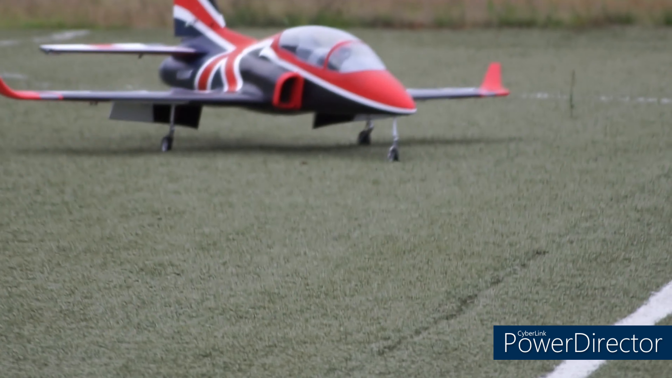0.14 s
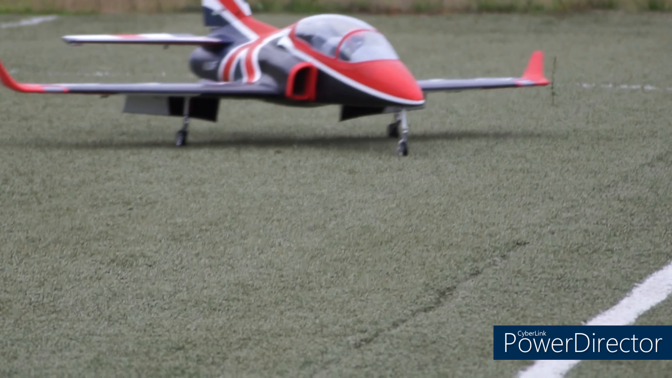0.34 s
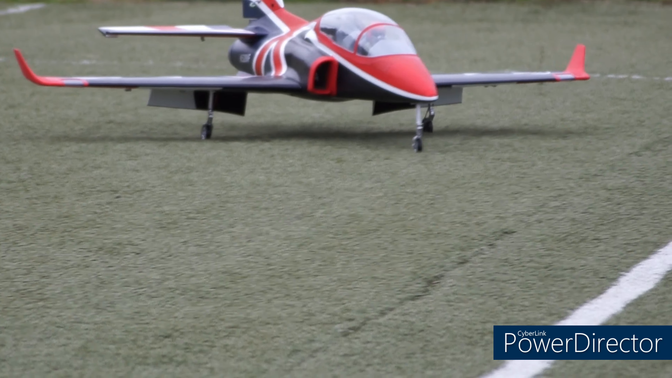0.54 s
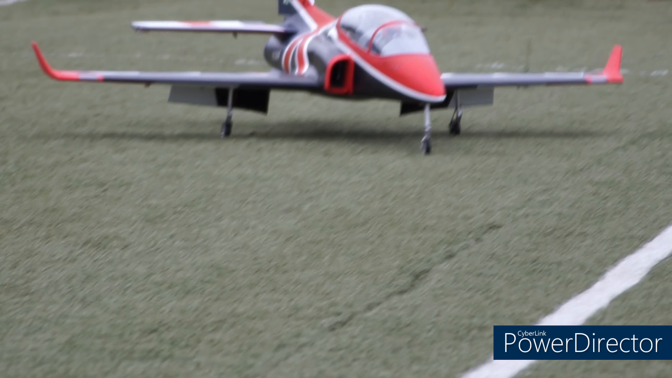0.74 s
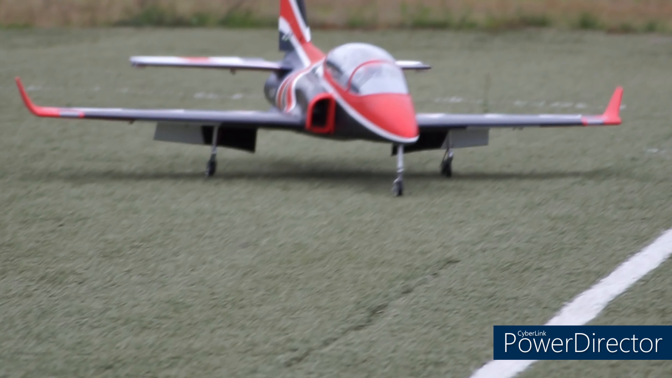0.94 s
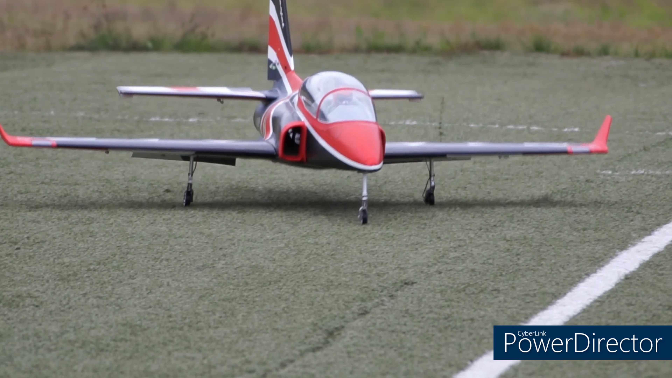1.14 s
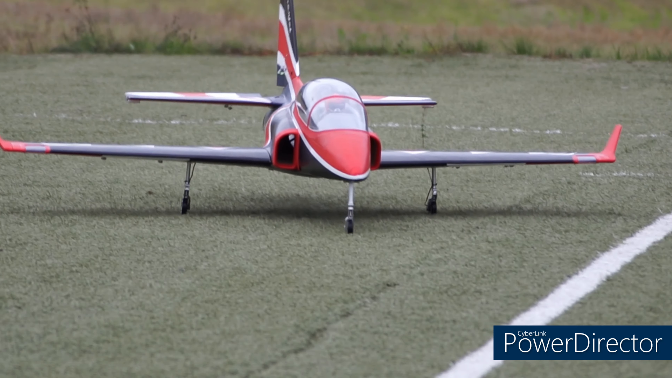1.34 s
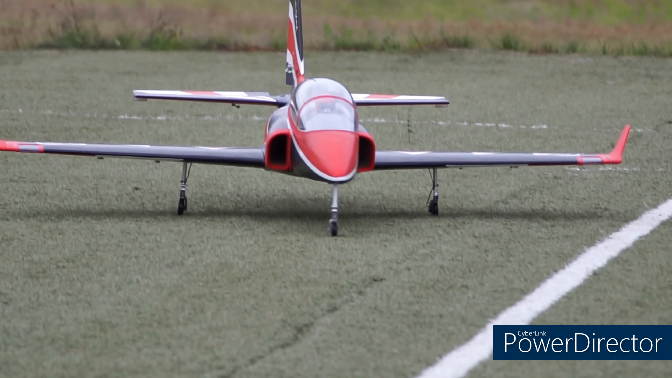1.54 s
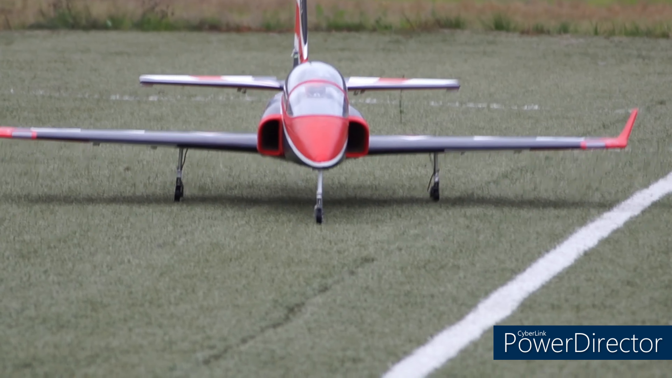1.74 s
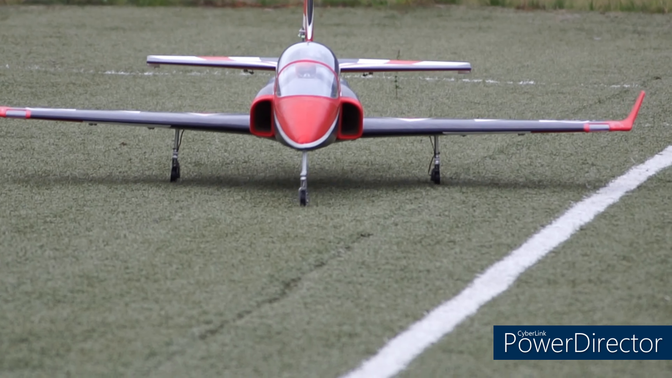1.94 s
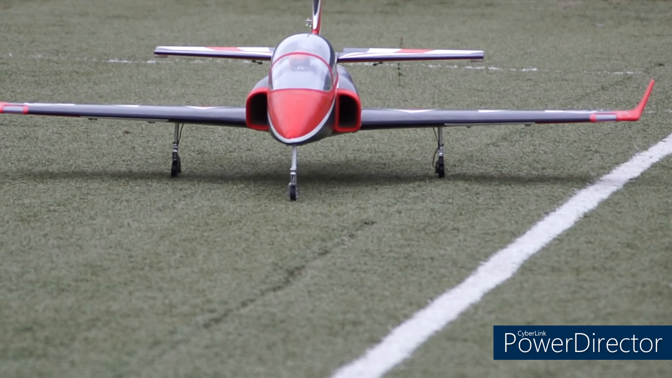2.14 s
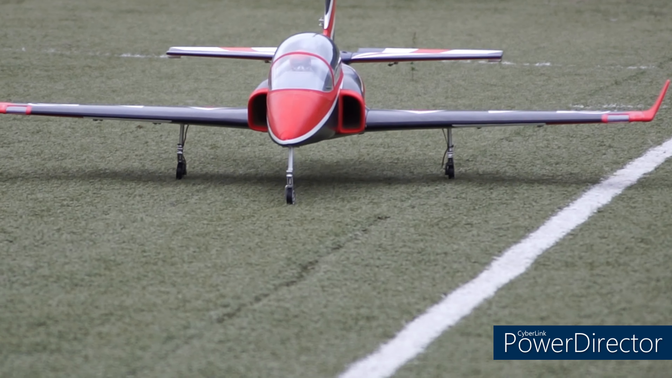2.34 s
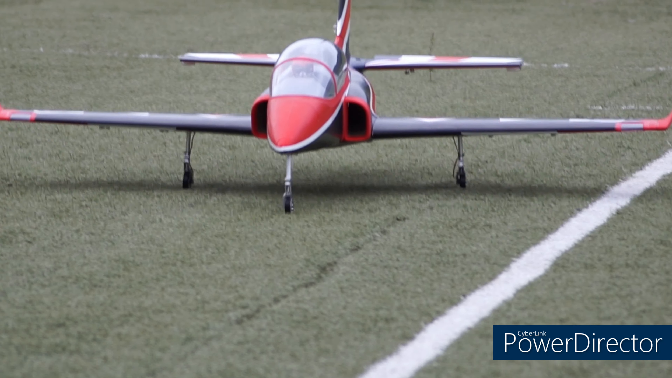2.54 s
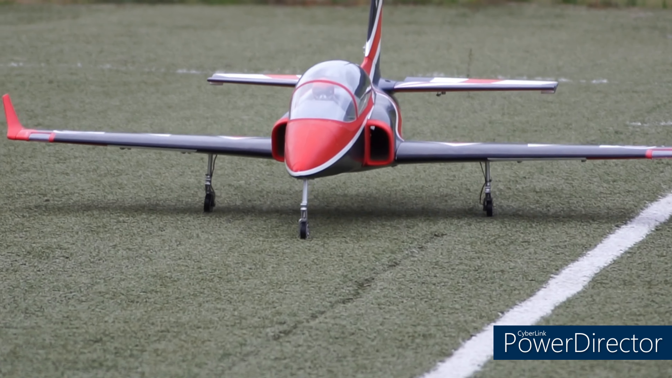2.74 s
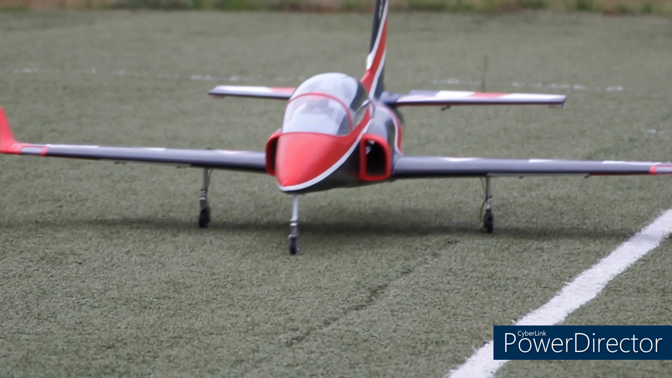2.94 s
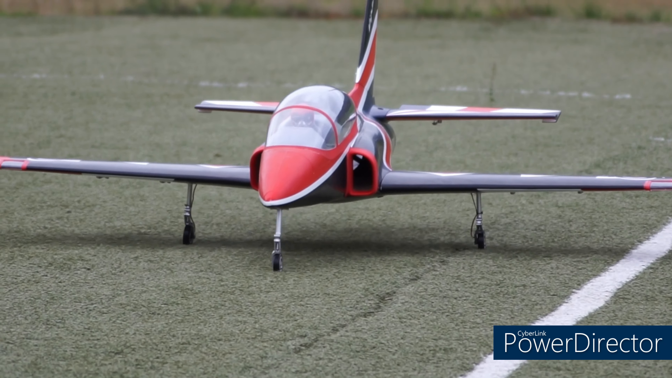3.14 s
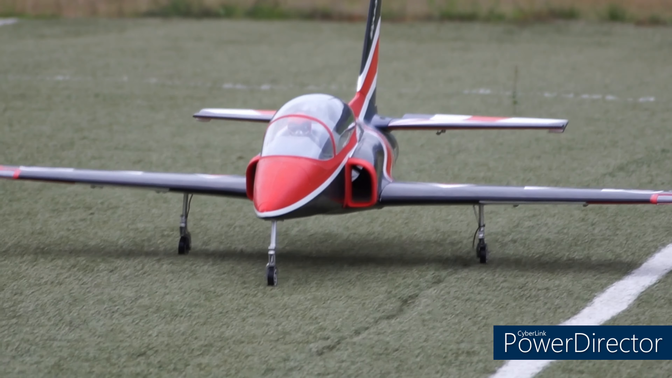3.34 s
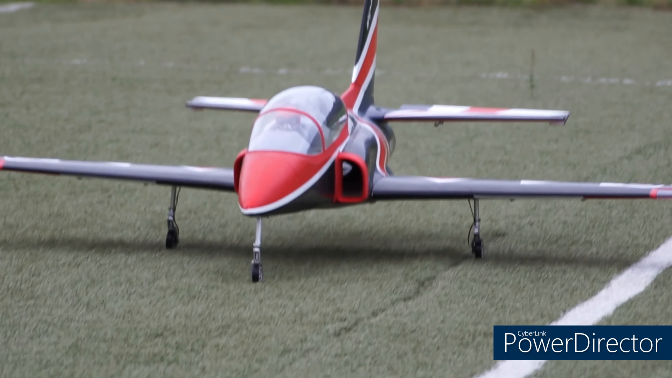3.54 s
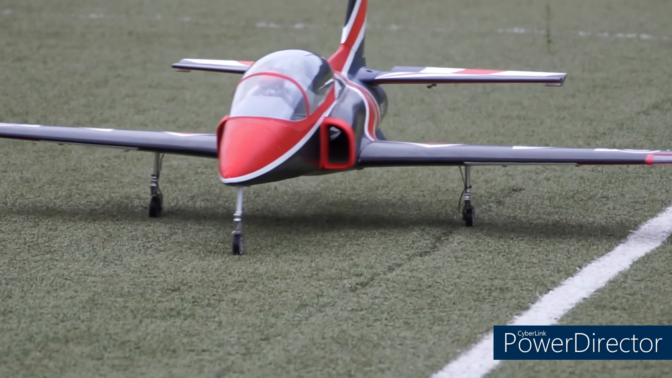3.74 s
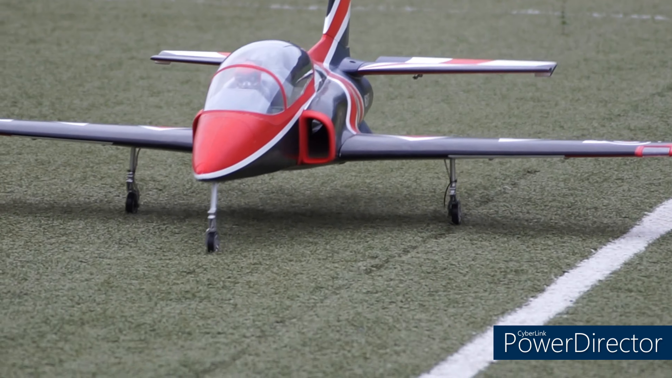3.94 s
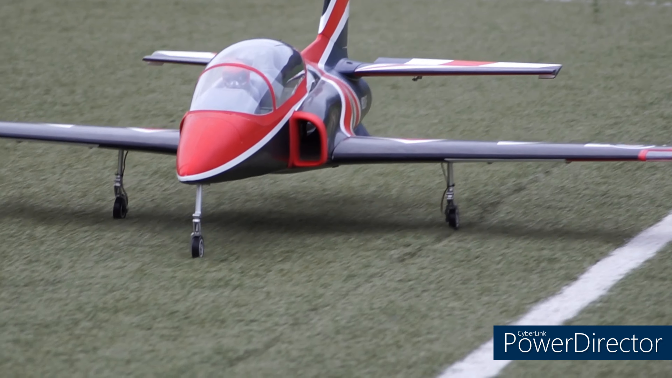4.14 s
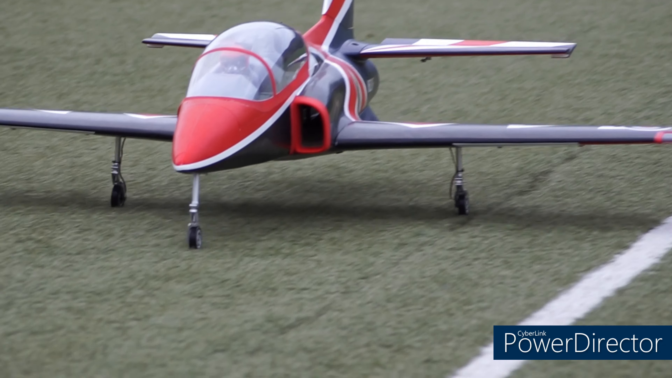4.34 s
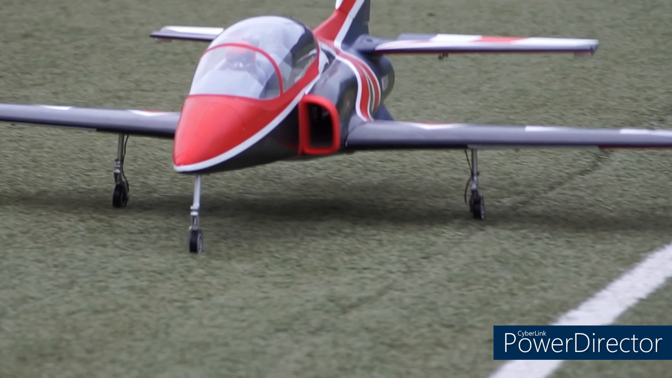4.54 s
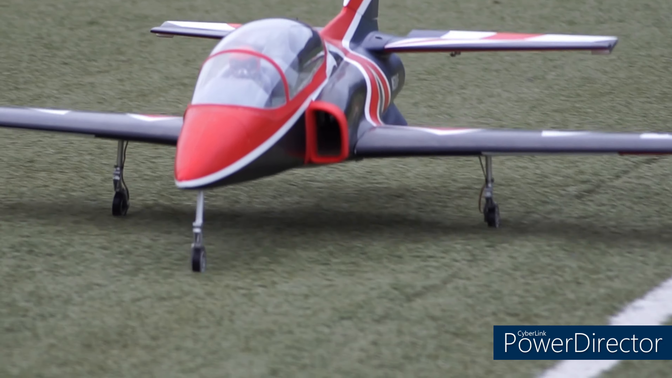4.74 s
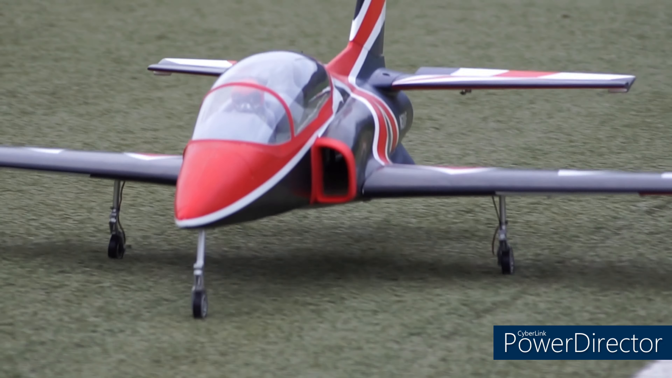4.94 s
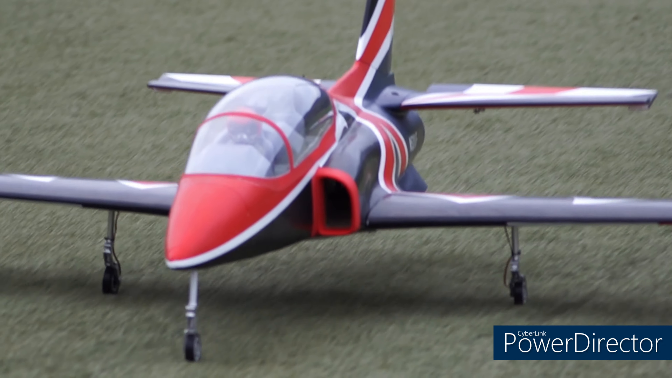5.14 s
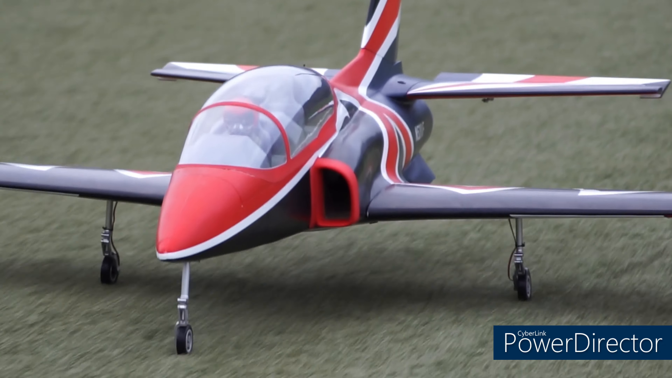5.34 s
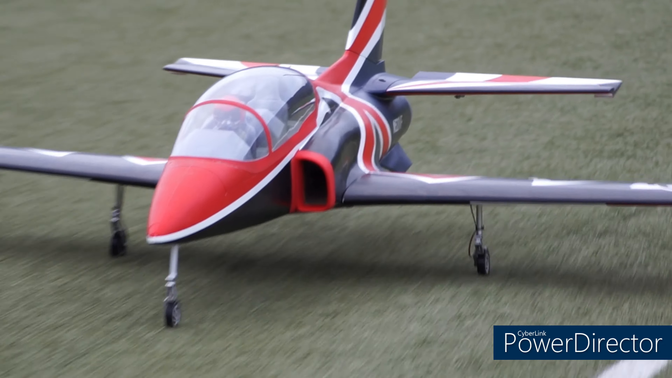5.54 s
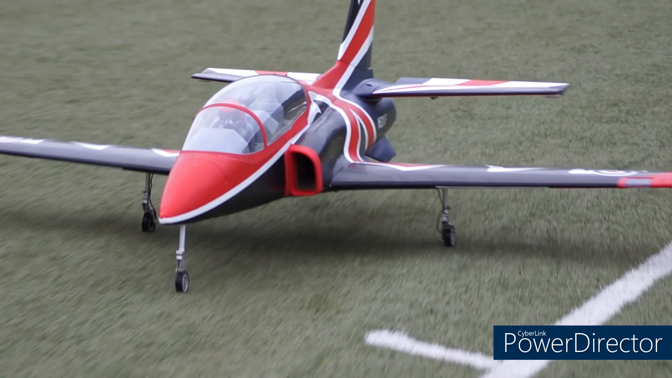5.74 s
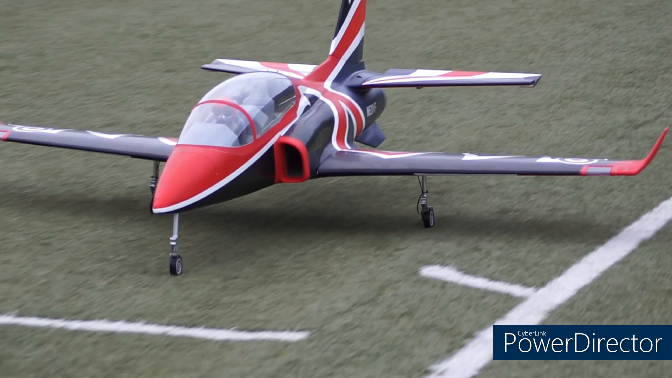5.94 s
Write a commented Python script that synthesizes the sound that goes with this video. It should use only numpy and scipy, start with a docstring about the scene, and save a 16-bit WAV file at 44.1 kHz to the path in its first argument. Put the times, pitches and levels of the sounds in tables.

```python
"""A five-bladed ducted fan whines and hisses: a model jet taxis over turf towards the listener.
It throttles down and up again; a beam of blade tone passes as the nose swings by.
The speed controller whistles at a fixed pitch, with sum and difference tones from the turning motor.
Sharp ticks and dull bumps, probably of the microphone housing, are struck modes; a faint breeze is noise."""
import sys
import numpy as np
from scipy import signal
from scipy.fft import rfft, irfft
from scipy.io import wavfile

SR = 44100
rng = np.random.default_rng(int(sys.argv[2]) if len(sys.argv) > 2 else 0)


def wav_out(sig):
    """Save sig, one row per channel (or a flat mono array), as 16-bit PCM at SR to the path in sys.argv[1]."""
    wavfile.write(sys.argv[1], SR, np.round(np.clip(np.atleast_2d(sig).T, -1, 1) * 32767).astype(np.int16))


N = 268569
TIME_S = np.arange(N) / SR
FREQS_HZ = np.maximum(np.arange(N // 2 + 1) * SR / N, 1)
LEFT_RIGHT = np.array([[.5], [-.5]])   # splits a difference evenly between the ears

BLADES, POLES = 5, 12
SWITCHING_HZ, HOOT_HZ = 7721, 1180
CRUISE_TURNS_PER_S = 530
START_M, TAXI_M_PER_S = 12, 1.0
BEAM_DB, BEAM_WIDTH_DEG = -48.5, 4.3
PAN_START_DB, PAN_DB_PER_S = 0.5, -0.39   # left minus right: a slow crossing to the right
SLIP_S = 0.0045
CALM_DB = -81
WIND_FILTER_HZ, CUTOFF_HZ = 45, 15800

# fan shaft speed under throttle: time_s, turns_per_s
SHAFT_SPEED = [(0, 483), (.29, 483), (.42, 464), (.58, 438), (.78, 426), (1.35, 431), (2.08, 462),
               (2.42, 515), (2.5, 530), (2.74, 537), (3.08, 526.5), (3.86, 525.6), (4.03, 542),
               (4.13, 544.7), (4.27, 542.5), (4.57, 539), (4.8, 528), (4.97, 526.4), (5.18, 538),
               (5.63, 536.6), (5.95, 528.5), (6.09, 524)]
# nose off the line of sight: time_s, heading_deg
NOSE_HEADING = [(0, -28.5), (1.72, 0.5), (2.3, 8), (3, 6), (6.09, 42)]
# reference loudness of each jet part, before its spectral shaping: part: (level_db at cruise, start
# distance and head-on; db_per_speed_doubling; db_per_distance_halving; side_on_gain_db)
PART_LEVELS = {"rumble": (-66, 13.5, 7, 13.5), "rush": (-49.5, 6, 6, 1), "exhaust": (-51.5, 25, 11.5, 9),
               "intake": (-39, 24, 4, -10), "hiss": (-51, 5, 13, -2.7), "blade": (-58.5, 8.5, 17, 11.5),
               "octave": (-40, 6, 0, -2), "third": (-50.5, -2, 11.5, -6.5), "upper": (-54.5, 6, 11.5, 2),
               "beat": (-35, -6, 5.5, -1)}
# duct response to the first three blade harmonics: pitch_hz, gain_db
DUCT_RESPONSE = [(2130, 0), (2300, 4), (2350, 1.5), (2420, 0), (2470, 0), (2570, -9), (2622, -2.5),
                 (2720, -2.5), (4250, -4.5), (4500, -3), (4640, -8.5), (4830, -14), (5150, -0.5),
                 (5330, 1.5), (6400, 3), (6900, 1), (7300, 0), (7900, -9), (8000, -7), (8060, -1.5),
                 (8170, -39)]
# upper blade harmonics, all smeared: multiple, relative_level_db, width_hz
UPPER_HARMONICS = [(4, -1.5, 570), (5, -7.5, 500)]
# the octave rings out clean for a moment: centre_s, level_db, width_s
OCTAVE_SWELL_ROWS = [(.72, -43.5, 0.039)]
# controller whistle fading in and out: time_s, relative_level_db
WHISTLE_FADES = [(0.0, -65), (0.29, -58), (0.64, -78), (0.77, -78), (0.79, -67), (1.05, -78), (1.19, -62),
                 (1.43, -59), (1.61, -70), (1.84, -56), (2.14, -54), (2.45, -60), (2.88, -53), (4.6, -62)]
# sum tone, one blade rate above switching: time_s, level_db
SUM_TONE_FADES = [(0, -76), (1.3, -64), (2.8, -78), (4.2, -48), (6.09, -57)]
# fuselage radiation of the difference tone: pitch_hz, gain_db
FUSELAGE_RESPONSE = [(1185, 0), (1202, -2), (1220, -11.5), (1272, -11.5), (1335, -22), (1400, -17.5),
                     (1455, -19), (1535, -9), (1640, -24), (1900, -53)]
# one hoot of the hollow resonance: centre_s, level_db, width_s
HOOT_SWELL_ROWS = [(2.07, -49.5, 0.085)]
# airflow noise colours: pitch_hz, relative_density_db_per_hz
RUMBLE_SPECTRUM = [(20, -48), (60, -25), (130, -15), (190, 1), (290, -2.5), (440, 6.5), (500, 2), (600, 4),
                   (900, -29)]
RUSH_SPECTRUM = [(300, -40), (520, -33), (660, 1.5), (750, -3.5), (920, 3), (1060, -4), (1270, -1),
                 (1400, -1), (1560, -0.5), (1900, -7.5), (2200, -3), (2600, -16.5), (4000, -17)]
EXHAUST_SPECTRUM = [(300, -64), (1000, -26), (2000, -8), (2450, 2.5), (3200, 1.5), (3800, 4), (4400, 6.5),
                    (4900, -2), (5800, -25), (7300, -11), (8200, -4.5), (9500, -4), (10800, -9.5),
                    (12000, -24)]
INTAKE_SPECTRUM = [(3000, -40.5), (3700, -12.5), (4200, -2), (4800, 2.5), (5400, 0), (6000, 2.5),
                   (6600, -1), (7000, -3), (7400, -24.5), (9000, -40), (12000, -46)]
HISS_SPECTRUM = [(2000, -39), (5000, 0), (7000, -2), (7900, -1), (8800, 1), (10000, 0), (10800, -4),
                 (11800, 0), (12500, 2), (13500, 1.5), (14600, 3), (15700, -6), (16000, -4)]
# left-right likeness of air noise: pitch_hz, likeness (0 to 1)
EAR_LIKENESS = [(30, .88), (70, 0.43), (130, 0.99), (280, 1), (650, 0.77), (1500, 0.7), (2100, 0.92),
                (3200, 0.72), (4500, 1), (5400, 0.94), (6300, 0.88), (7200, 0.78), (8000, 0.98), (9200, 1),
                (10800, 0.57), (12500, 0.77), (14000, 1)]
# microphone port colour: pitch_hz, left_minus_right_db
PORT_DIFFERENCE = [(200, 0.5), (1300, 1), (2500, -2), (3400, 1), (4500, 1), (6000, 3), (8000, -1.5),
                   (11000, 0.7), (14000, 1.5)]
# housing ticks: start_s, relative_peak_db, front_pitch_hz, relative_rattle_db
HOUSING_TICKS = [(0.0719, -16.5, 6500, -5.5), (0.1199, -29, 3340, 2), (0.166, -42, 3000, 2),
                 (0.743, -31.5, 2820, -7.5), (.791, -23, 2040, -13), (0.7971, -17, 6170, -10.5),
                 (0.89, -18, 2970, -11), (0.9514, -14, 6850, -7.5), (.960, -27.5, 3660, -3),
                 (1.002, -38.5, 2000, -0.5), (1.102, -41.5, 2220, -1), (2.276, -35.5, 2800, 0),
                 (2.3254, -18, 5500, -7.5), (2.3319, -19, 2200, -4), (3.103, -15.5, 7150, -6.5),
                 (3.11, -21, 2600, -10), (4.775, -27.5, 2000, -15), (4.819, -21, 2620, -7),
                 (4.829, -8, 2200, -13), (5.245, -20, 2420, -4), (5.448, -26, 1780, -5),
                 (5.566, -22, 1880, -9)]
# housing modes: pitch_hz, relative_level_db, t60_s
HOUSING_MODES = [(678, -13.5, 0.12), (932, -5, 0.023), (1125, -5, 0.056), (1483, 3.5, 0.019),
                 (1690, -4.5, 0.027), (1820, -14.5, 0.0065), (1937, 5, 0.01), (2332, 1, 0.063),
                 (2650, 0, 0.014), (3320, -0.5, 0.026), (4020, -30, 0.029), (3980, 6, 0.0028),
                 (5680, 3, 0.0051)]
# duller housing bumps: start_s, force_db
HOUSING_BUMPS = [(0.124, -38.5), (0.801, -48), (.9, -42), (1.004, -47), (2.3365, -31.5), (4.831, -31.5),
                 (5.304, -36)]
# breeze colour: pitch_hz, relative_density_db_per_hz
BREEZE_COLOUR = [(20, -22), (45, -6), (70, -4), (105, -3), (160, -6.5), (400, -25)]
# puffs of breeze: centre_s, level_db, width_s
BREEZE_GUSTS = [(1.2, -75, 0.16), (1.7, -76, 0.35), (3.5, -78, 0.49)]


def fan(angle_rad, turns_per_s, heading_deg, gain):
    """Blades sound harmonics of their passing rate; the higher ones are more smeared by turbulence."""
    blade_rad, blade_hz = BLADES * angle_rad, BLADES * turns_per_s

    # the blade tone also beams straight ahead out of the intakes
    beam = from_db(BEAM_DB) * np.exp(-(heading_deg / BEAM_WIDTH_DEG) ** 2)
    fundamental = gain["blade"] * passed(DUCT_RESPONSE, blade_hz)
    clean_first = tone(blade_rad, flutter_db=2.5, wobble_rad=0.63, ear_shift_rad=0.27)
    out = (from_db(-1.5) * fundamental + beam) * clean_first
    out = out + fundamental * skirt(blade_rad, width_hz=123, spread=0.25)

    octave = gain["octave"] * passed(DUCT_RESPONSE, 2 * blade_hz)
    clean_octave = tone(2 * blade_rad, flutter_db=3.0, wobble_rad=0.43, ear_shift_rad=.15)
    out = out + (from_db(-4.5) * octave + swells(OCTAVE_SWELL_ROWS)) * clean_octave
    out = out + octave * skirt(2 * blade_rad, width_hz=204, spread=0.11)

    third = gain["third"] * passed(DUCT_RESPONSE, 3 * blade_hz)
    out = out + third * skirt(3 * blade_rad, width_hz=340, spread=0.23)
    for multiple, level_db, width_hz in UPPER_HARMONICS:
        smeared = skirt(multiple * blade_rad, width_hz, spread=0.34)
        out = out + gain["upper"] * from_db(level_db) * smeared
    return out


def drive(angle_rad, turns_per_s, gain):
    """Windings sing at the switching rate; rotation adds sum and difference tones; the fuselage hoots."""
    switching_rad = 2 * np.pi * SWITCHING_HZ * TIME_S
    whistle = tone(switching_rad, flutter_db=1.0, wobble_rad=0.3, ear_shift_rad=0.95)
    whistle = from_db(5.0 + in_time(WHISTLE_FADES)[0]) * whistle

    difference_hz = SWITCHING_HZ - POLES * turns_per_s
    difference_rad = switching_rad - POLES * angle_rad
    difference = tone(difference_rad, flutter_db=1.17, wobble_rad=0.4, ear_shift_rad=0.087)
    difference = gain["beat"] * passed(FUSELAGE_RESPONSE, difference_hz) * difference

    sum_rad = switching_rad + BLADES * angle_rad
    sum_tone = tone(sum_rad, flutter_db=3.0, wobble_rad=1.5, ear_shift_rad=0.49)
    sum_tone = from_db(in_time(SUM_TONE_FADES)[0]) * sum_tone

    hoot = tone(2 * np.pi * HOOT_HZ * TIME_S, flutter_db=6.0, wobble_rad=.6, ear_shift_rad=.3)
    return whistle + difference + sum_tone + swells(HOOT_SWELL_ROWS) * hoot


def airflow(gain):
    """Wheels and jet rumble over turf; air rushes through intakes and tailpipe, each part wavering."""
    spectra = {"rumble": RUMBLE_SPECTRUM, "rush": RUSH_SPECTRUM, "exhaust": EXHAUST_SPECTRUM,
               "intake": INTAKE_SPECTRUM, "hiss": HISS_SPECTRUM}
    out = 0
    for part, spectrum in spectra.items():
        waver = from_db(0.96 * drift(3.2))
        out = out + gain[part] * waver * air_noise(spectrum)
    return out


def loudness(turns_per_s, heading_deg):
    """Gain of each jet part from fan speed, distance and heading."""
    speed_doublings = np.log2(turns_per_s / CRUISE_TURNS_PER_S)
    distance_halvings = np.log2(START_M / (START_M - TAXI_M_PER_S * TIME_S))
    side_on = np.abs(np.sin(np.radians(heading_deg)))
    return {part: from_db(db + speed_db * speed_doublings + near_db * distance_halvings + side_db * side_on)
            for part, (db, speed_db, near_db, side_db) in PART_LEVELS.items()}


def place(jet):
    """The level balance pans the jet slowly from left to right; the two ports colour it differently."""
    pan_db = PAN_START_DB + PAN_DB_PER_S * TIME_S
    panned = jet * from_db(pan_db * LEFT_RIGHT)
    return irfft(rfft(panned) * from_db(over_hz(PORT_DIFFERENCE) * LEFT_RIGHT), N)


def ticks(settle_hz=1560, sweep_s=0.000636, rattle_s=0.0036, ear_shift_rad=1.91, size=5000):
    """A slip sends a bending wave through the housing, highs first; its reflections rattle the modes."""
    out, t = np.zeros((2, N + size)), np.arange(size) / SR
    for start_s, peak_db, front_hz, rattle_db in HOUSING_TICKS:
        pitch_hz = settle_hz + (front_hz - settle_hz) * np.exp(-t / sweep_s)
        phase_rad = 2 * np.pi * np.cumsum(pitch_hz) / SR
        envelope = (1 - np.exp(-t / 0.00024)) * np.exp(-(t / SLIP_S) ** 4)
        wave = envelope * np.sin(phase_rad + ear_shift_rad * LEFT_RIGHT)

        reflections = rng.standard_normal((2, size)) * np.exp(-t / (2 * rattle_s))
        rattle = 0
        for k, (hz, mode_db, t60_s) in enumerate(HOUSING_MODES):
            # modes above the front are hardly reached
            reach = 1 / (1 + (hz / (1.1 * front_hz)) ** 4)
            mode = rms_one(ring(reflections, hz, t60_s))
            rattle = rattle + from_db(mode_db) * reach * mode * (-1) ** k
        rattle = from_db(rattle_db + 7.5) * rattle / np.abs(rattle).max()

        at = round(start_s * SR)
        out[:, at:at + size] += from_db(peak_db + 2) * (wave + rattle)
    return out[:, :N]


def bumps():
    """Soft pushes set only three low housing modes ringing."""
    force = np.full(N, 1e-18)   # inaudible floor
    for start_s, force_db in HOUSING_BUMPS:
        force[round(start_s * SR)] = from_db(force_db)
    low, middle = ring(force, hz=332, t60_s=0.027), ring(force, hz=408, t60_s=0.024)
    return .5 * low - middle + 1.05 * ring(force, hz=573, t60_s=0.026)


def housing():
    """The small, stiff housing passes little below its lowest modes."""
    highpass = signal.butter(2, 260, "high", fs=SR, output="sos")
    return signal.sosfilt(highpass, ticks() + bumps())


def breeze():
    """Coloured noise at the microphone, swelling in puffs over a calm floor."""
    strength = from_db(CALM_DB) + swells(BREEZE_GUSTS)
    return strength * from_db(3 * drift(8.7)) * air_noise(BREEZE_COLOUR)


def tone(phase_rad, flutter_db, wobble_rad, ear_shift_rad):
    """A tone of rms 1 that flutters in moving air and reaches the ears out of step."""
    wandering_rad = phase_rad + wobble_rad * drift(11.5)
    flutter = from_db(flutter_db * drift(32))
    return rms_one(flutter * np.sin(wandering_rad + ear_shift_rad * LEFT_RIGHT))


def skirt(phase_rad, width_hz, spread):
    """Chopped turbulence: a tone of random strength and phase, partly different at each ear."""
    mid, side = [drift(width_hz) * np.cos(phase_rad) + drift(width_hz) * np.sin(phase_rad)
                 for _ in range(2)]
    return rms_one(mid + spread * side * np.array([[1], [-1]]))


def air_noise(spectrum):
    """Coloured stereo noise of rms 1, its likeness at the two ears set per frequency."""
    mid, side = rfft(rng.standard_normal((2, N))) * from_db(over_hz(spectrum))
    alike = np.clip(over_hz(EAR_LIKENESS), 0, 1)
    both_ears = np.sqrt(1 + alike) * mid + np.sqrt(1 - alike) * side * [[1], [-1]]
    return rms_one(irfft(both_ears, N))


def ring(force, hz, t60_s):
    """One decaying mode: a unit click sets a sine of height 1 ringing."""
    radius, step_rad = from_db(-60 / (t60_s * SR)), 2 * np.pi * hz / SR
    feedback = [1, -2 * radius * np.cos(step_rad), radius * radius]
    return signal.lfilter([0, np.sin(step_rad)], feedback, force)


def drift(rate_hz):
    """Random wander of rms 1, mostly slower than the given rate."""
    return rms_one(irfft(rfft(rng.standard_normal(N)) / (1 + (FREQS_HZ / rate_hz) ** 2), N))


def swells(rows):
    """Summed gain of bell-shaped swells."""
    return sum(from_db(db) * np.exp(-((TIME_S - s) / width_s) ** 2) for s, db, width_s in rows)


def passed(response, hz):
    """Gain of a gliding tone through a fixed response."""
    return from_db(np.interp(hz, *np.transpose(response)))


def in_time(rows):
    """One value per sample for each column after time_s."""
    s, *columns = np.transpose(rows)
    return [np.interp(TIME_S, s, column) for column in columns]


def over_hz(points):
    """A table over frequency, joined on a log axis."""
    hz, value = np.transpose(points)
    return np.interp(np.log(FREQS_HZ), np.log(hz), value)


def from_db(db):
    """Decibels to amplitude gain."""
    return 10 ** (np.asarray(db) / 20)


def rms_one(x):
    """Scale to unit power."""
    return x / np.sqrt(np.mean(np.abs(x) ** 2) + 1e-20)


def scene():
    """Fan speed, distance and heading drive the jet; housing and breeze sound at the microphone."""
    turns_per_s, = in_time(SHAFT_SPEED)
    heading_deg, = in_time(NOSE_HEADING)
    angle_rad = 2 * np.pi * np.cumsum(turns_per_s) / SR
    gain = loudness(turns_per_s, heading_deg)
    jet = fan(angle_rad, turns_per_s, heading_deg, gain)
    jet = jet + drive(angle_rad, turns_per_s, gain) + airflow(gain)
    return place(jet) + housing() + breeze()


def record(dry):
    """A wind filter thins the deep bass; a steep filter cuts the top."""
    highpass = signal.butter(2, WIND_FILTER_HZ, "high", fs=SR, output="sos")
    lowpass = signal.ellip(12, .1, 80, CUTOFF_HZ, fs=SR, output="sos")
    return signal.sosfilt(lowpass, signal.sosfilt(highpass, dry))


dry = scene()
out = record(dry)
wav_out(out)
```